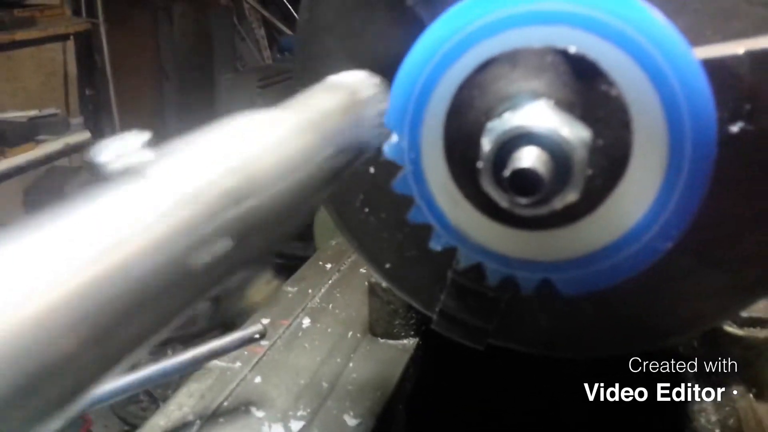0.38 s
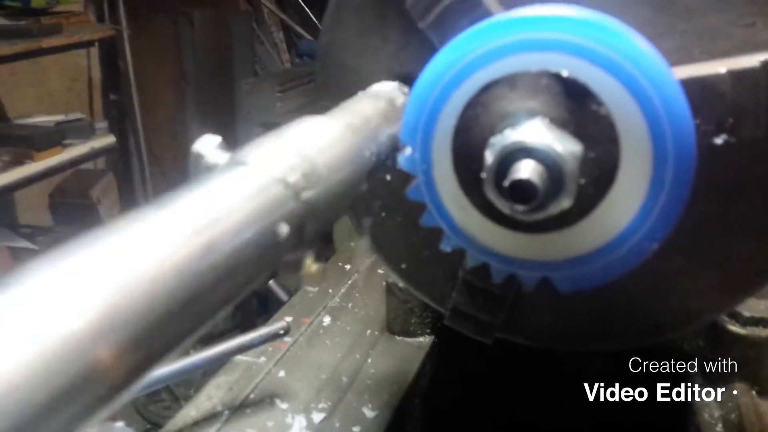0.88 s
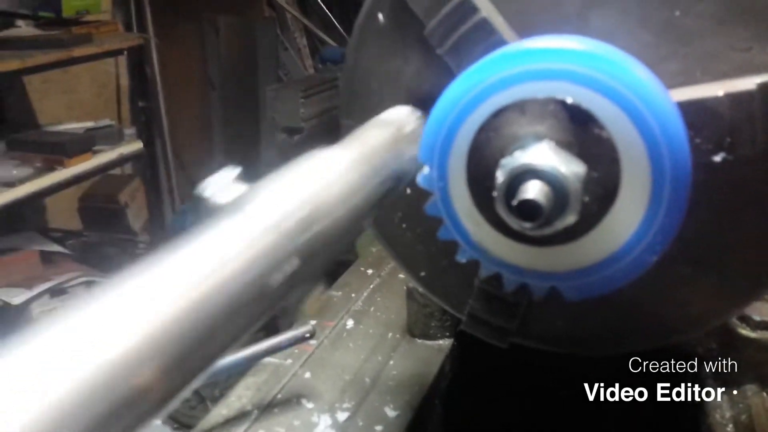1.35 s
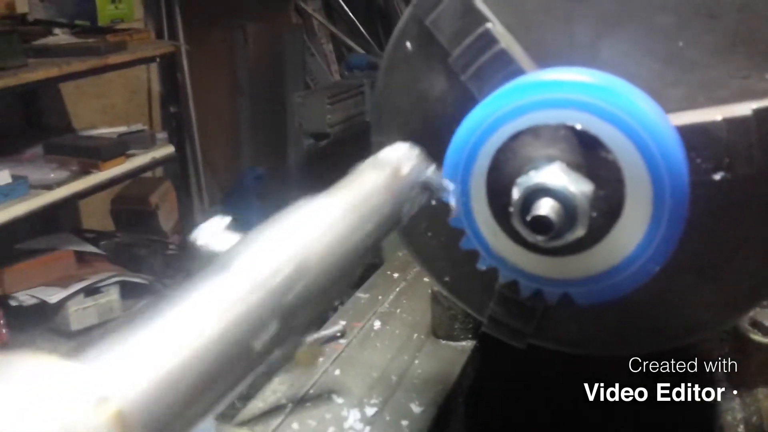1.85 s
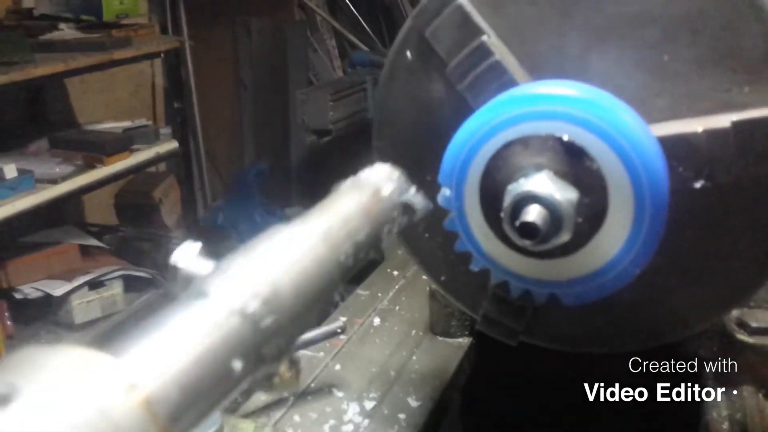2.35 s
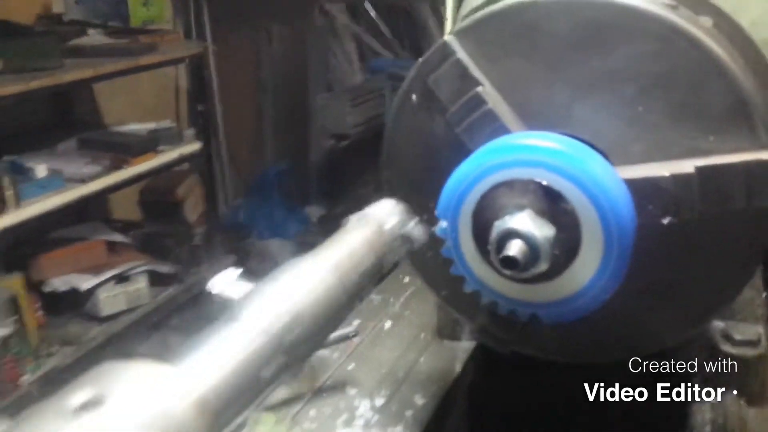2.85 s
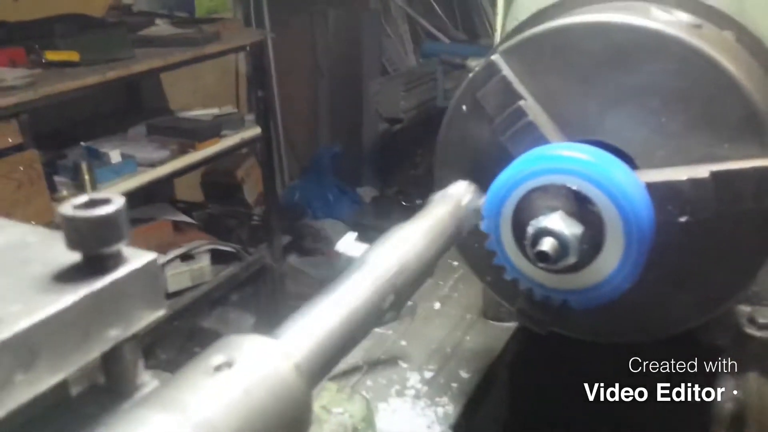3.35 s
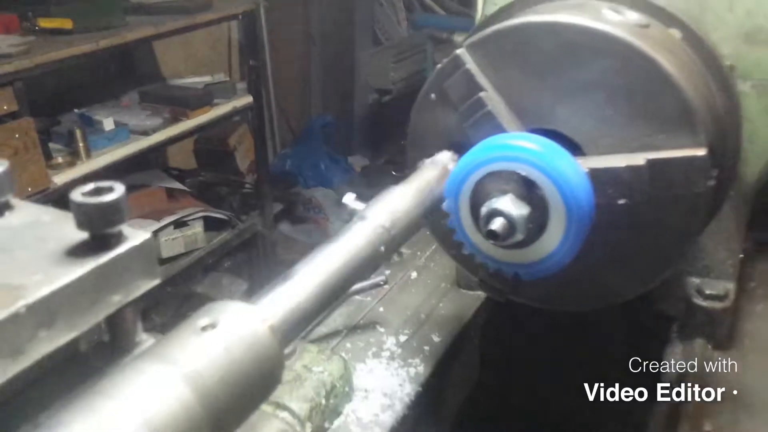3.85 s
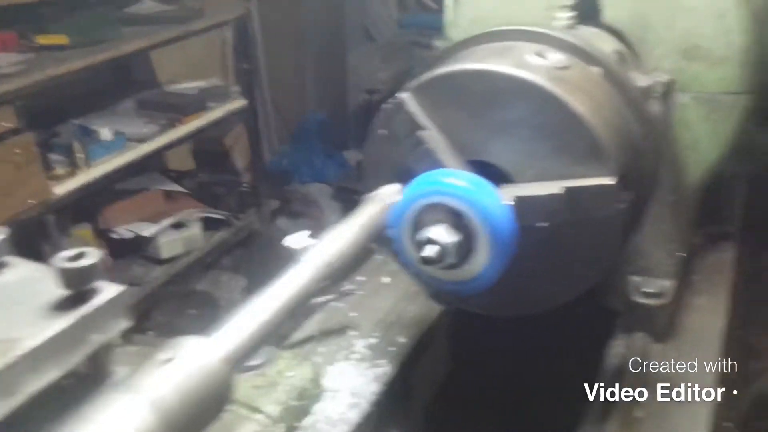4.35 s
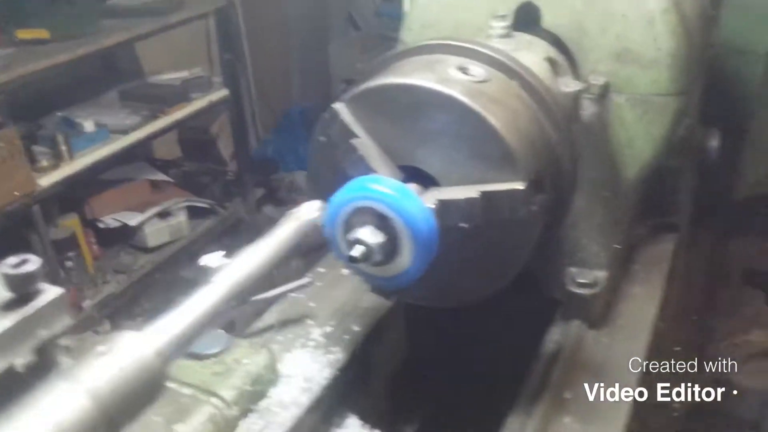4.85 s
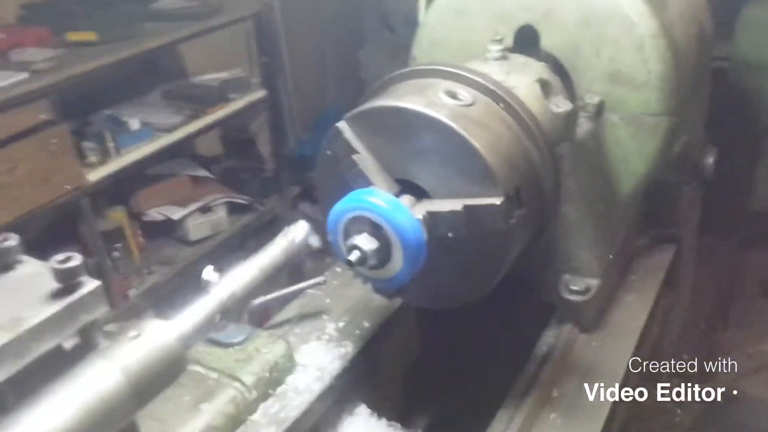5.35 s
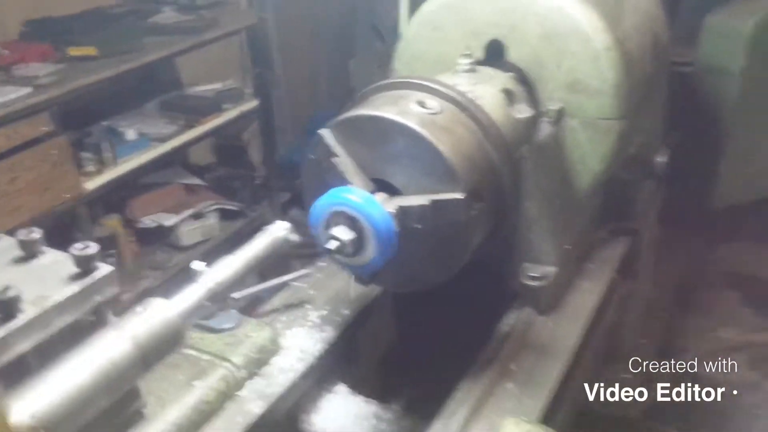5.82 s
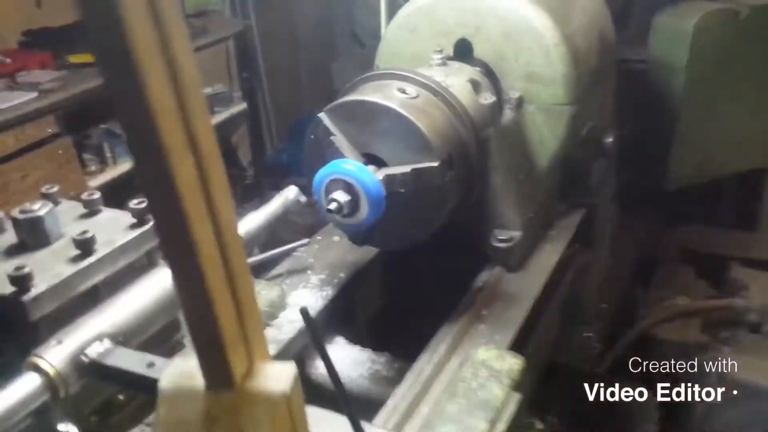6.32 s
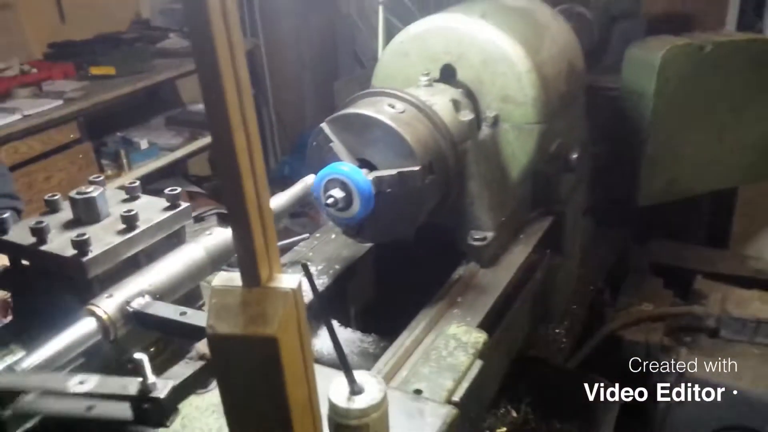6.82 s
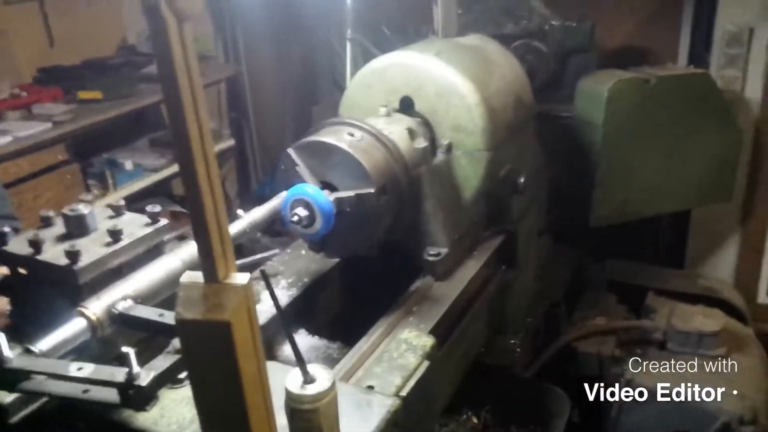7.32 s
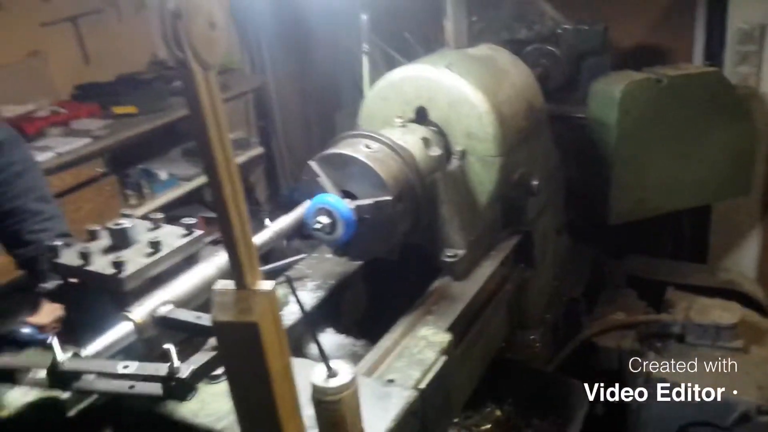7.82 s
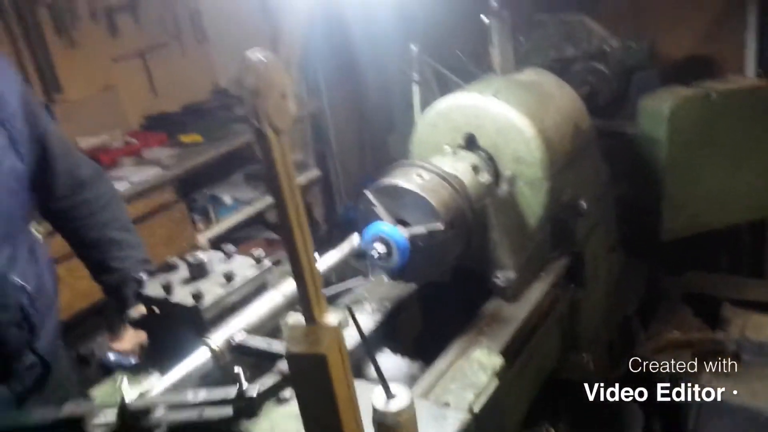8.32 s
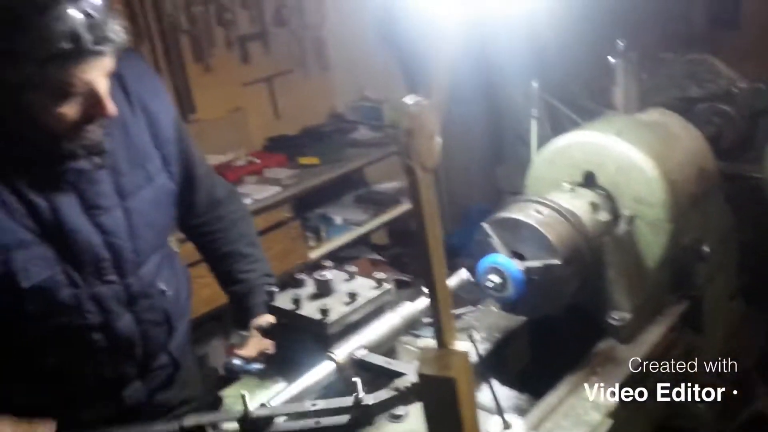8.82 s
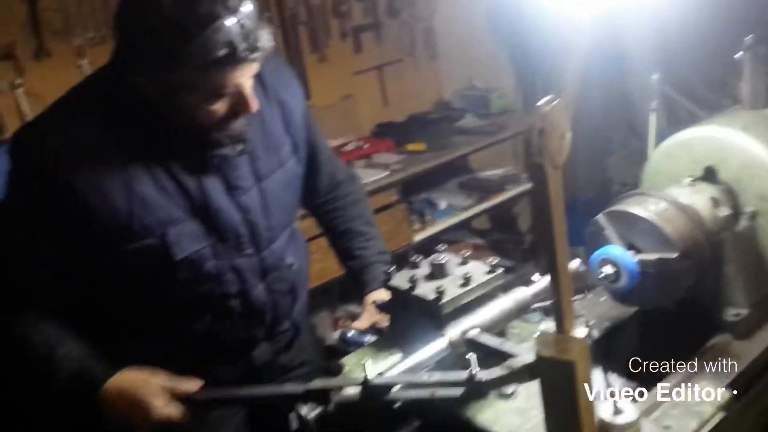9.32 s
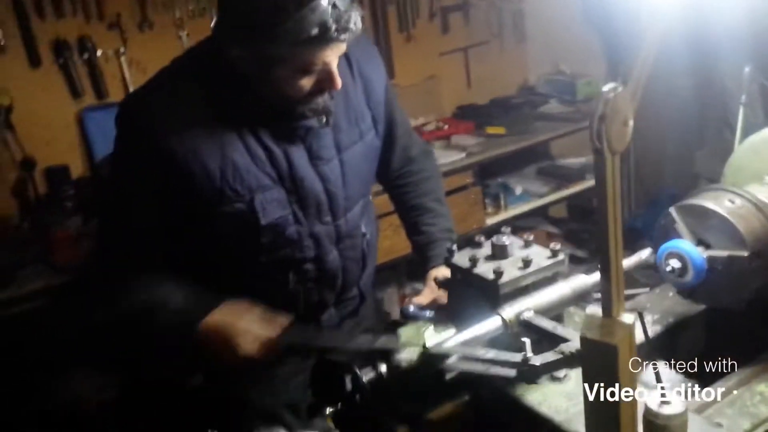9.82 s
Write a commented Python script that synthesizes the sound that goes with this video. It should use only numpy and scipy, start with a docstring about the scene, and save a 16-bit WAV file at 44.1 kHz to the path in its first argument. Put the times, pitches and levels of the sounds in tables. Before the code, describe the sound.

From 0 s, a close, regular metallic rhythm is already running: a softer return scrape, then a sharp cutting bite at about 0.3 s, repeating roughly every 0.43 s to the end near 9.8 s. Each cut is a very short, gritty snap with a bright, high ring and tearing hiss; each return is a slightly longer, quieter rub. Dry chip and linkage ticks scatter between, with a crisp one near 0.4 s and a faint airy swish around 0.2 s. From about 3 to 6 s the phone backs away and strokes soften, losing close hiss. After 6 s they are light and distant, ticks sparser. Faint swishes pass around 5.6, 7.3 and 8.2 s, with a dull, low knock near 8.1 s. Quiet workshop hum and short echoes remain; the right side is clear, the left muffled.

```python
"""Rough metallic strokes, a little over twice a second: a hand lever drives a slotting bar through a gear blank
in a lathe chuck. Each cut is a noisy force on the bar's modes, and each return stroke a softer scrape on the same.
Chips and linkage slack tick between, airy swishes pass, a dull knock falls near the phone, and the shop hums low.
The phone backs away, so modes, tear, drone and stray chips change level on the way.
Its left port is covered, which leaves that side dull and faint."""
import sys
import numpy as np
from scipy import signal
from scipy.fft import rfft, irfft, next_fast_len
from scipy.io import wavfile
from scipy.ndimage import uniform_filter1d

SR = 44100
rng = np.random.default_rng(int(sys.argv[2]) if len(sys.argv) > 2 else 0)


def dump_mix(stems):
    """Bounce the given channels to the path in sys.argv[1] as a 16-bit WAV at rate SR."""
    frames = np.atleast_2d(stems).T  # one column per channel
    limited = np.clip(frames, -1, 1)  # hard clip at full scale
    pcm = np.round(limited * 32767).astype(np.int16)
    wavfile.write(sys.argv[1], SR, pcm)


def undo_db(level):
    """Turn decibels back into plain size, where 20 dB means ten times bigger."""
    steps = np.asarray(level, float) / 20
    return 10 ** steps


N = 437913
T = np.arange(N) / SR
AWAY = T / T[-1]  # how far the phone has backed off: 0 at the start, 1 furthest off

# Cutting strokes of the bar:
# (time [s], length [s], bite force [dB], chatter force [dB], extra level of the ring near 4 kHz [dB])
CUT_STROKES = [(0.281, 0.039, -19.5, -23, -7), (0.707, 0.031, -36, -26.5, 5.5),
               (1.113, 0.036, -27, -25, 0.5), (1.535, 0.036, -52, -29.5, 4), (1.978, 0.027, -20, -27.5, -4),
               (2.42, 0.025, -27.5, -28, 13), (2.862, 0.033, -21.5, -31, 2),
               (3.283, 0.024, -28.5, -30.5, -2), (3.714, 0.029, -33, -33.5, 6.5),
               (4.145, 0.03, -29, -38, 6), (4.584, 0.034, -31, -32, -10), (5.01, 0.027, -31, -32.5, -18),
               (5.444, 0.03, -27, -35.5, -11), (5.874, 0.03, -31, -38, 3), (6.317, 0.036, -35, -46, 11),
               (6.731, 0.04, -49, -44.5, 4), (7.17, 0.035, -37.5, -45, 11), (7.584, 0.03, -36.5, -45.5, -1),
               (8.031, 0.026, -42, -45, -11), (8.464, 0.028, -29.5, -38, -2),
               (8.92, 0.037, -37.5, -48.5, 12), (9.357, 0.032, -36.5, -45.5, 11),
               (9.793, 0.032, -39, -46.5, 8)]
# Return strokes of the bar: (time [s], contact [s], rubbing force at mid-stroke [dB])
RETURN_STROKES = [(0.035, 0.073, -35.5), (0.472, 0.075, -36.5), (0.913, 0.07, -37), (1.327, 0.078, -41.5),
                  (1.757, 0.06, -39), (2.192, 0.062, -40), (2.623, 0.086, -42.5), (3.045, 0.095, -44),
                  (3.474, 0.088, -45.5), (3.904, 0.073, -44.5), (4.344, 0.083, -45), (4.781, 0.078, -46.5),
                  (5.217, 0.093, -48.5), (5.634, 0.067, -46.5), (6.066, 0.089, -57.5), (6.514, 0.082, -54),
                  (6.942, 0.079, -52.5), (7.343, 0.084, -48.5), (7.814, 0.084, -56), (8.237, 0.07, -50.5),
                  (8.674, 0.072, -54.5), (9.121, 0.11, -54.5), (9.559, 0.086, -54.5)]


def along(points, s):
    """Reads a curve of (time, value) points at the times s."""
    return np.interp(s, *np.transpose(points))


def shape(x, points):
    """Colours a sound by (frequency [Hz], level [dB]) points, joined along log frequency."""
    hz, db = np.transpose(points)
    size = next_fast_len(N + SR // 10)
    log_hz = np.log(np.arange(size // 2 + 1) * SR / size + 1)
    gain = undo_db(np.interp(log_hz, np.log(hz), db))
    return irfft(rfft(x, size) * gain, size)[..., :N]


def unit(x):
    """Scales to rms 1."""
    return x / np.sqrt(np.mean(x ** 2))


def ring(x, hz, width_hz):
    """One resonant mode; white noise comes out at about the level it went in."""
    radius = np.exp(-np.pi * width_hz / SR)
    angle = 2 * np.pi * hz / SR
    poles = [1, -2 * radius * np.cos(angle), radius * radius]
    return np.sqrt(1 - radius * radius) * signal.lfilter([1, 0, -1], poles, x)


def grit(grain_s, rough_db):
    """Stick-slip force: noise whose strength wanders from grain to grain."""
    grain = max(int(grain_s * SR), 2)
    steps = np.repeat(rng.standard_normal(N // 2 + 1)[:N // grain + 1], grain)[:N]
    strength = undo_db(rough_db * uniform_filter1d(steps, grain))
    return unit(strength * rng.standard_normal(N))


def lumps(lump_s=0.004, lump_db=3):
    """Uneven cutting force, as the chip builds up and breaks away in lumps."""
    lump = int(lump_s * SR)
    steps = lump_db * rng.standard_normal(N // lump + 2)
    return undo_db(np.interp(np.arange(N) / lump, np.arange(len(steps)), steps))


def cut_force(bite_rise_s=0.0007, bite_s=0.004, build_s=0.0049, exit_s=0.0099, drag_s=0.12):
    """The edge bites hard, chatters through the blank and leaves it; the bar's drag fades from the bite on."""
    # Drag of the bar, read at each cut: (time [s], level 0.1 s after the cut begins [dB])
    drag_curve = [(0, -50.5), (5.5, -50.5), (6.8, -55), (8.2, -50.5), (9.9, -50)]
    force, drag = np.zeros((2, N))
    uneven = lumps()
    for s, length, bite_db, chatter_db, _ in CUT_STROKES:
        i = int(s * SR)
        t = T[:min(SR // 2, N - i)]
        span = slice(i, i + len(t))
        bite = undo_db(bite_db) * np.exp(-t / bite_s) * (1 - np.exp(-t / bite_rise_s))
        leaving = np.exp(-np.maximum(t - length, 0) / exit_s)
        through = undo_db(chatter_db) * leaving * (1 - np.exp(-t / build_s))
        force[span] += bite + through * uneven[span]
        drag[span] += undo_db(along(drag_curve, s)) * np.exp((0.1 - t) / drag_s)
    return force, drag


def return_force(rise_s=0.0038, let_go_s=0.003, sag_db_per_s=-28.5):
    """The flank rubs back along the fresh tooth, swelling in, easing off and letting go."""
    force = np.zeros(N)
    for s, length, db in RETURN_STROKES:
        start, stop = max(int((s - 0.05) * SR), 0), int((s + length + 0.05) * SR)
        t = T[start:stop] - s
        gate = 1 / (1 + np.exp(-t / rise_s)) / (1 + np.exp((t - length) / let_go_s))
        force[start:stop] = gate * undo_db(db + sag_db_per_s * (t - length / 2))
    return force


def bar_modes(cutting, returning, dragging, drag_ring_db=-4, drag_dull_db=-3, scatter_db=2,
              tilt_scatter_db=2.5, sharpest=40):
    """The bar and bed modes, shaken by all three forces, with a fresh balance at every stroke."""
    # Modes of bar and bed: (frequency [Hz], width before damping [Hz], level cutting [dB],
    # level returning [dB], change with the phone half way off [dB], change furthest off [dB])
    mode_table = [(635, 450, -39.5, -33, 15, 5.5), (1500, 550, -44.5, -25, 11.5, 10.5),
                  (2499, 61, -20, -11.5, 8, 3), (2757, 102, -14, -17, 11, 3), (3310, 67, 1.5, -1, 0, -2.5),
                  (3442, 41, -1, -5.5, -0.5, 3.5), (3917, 33, -2, -1.5, -4.5, -3),
                  (4010, 27, -22, -20.5, -11, 1), (4360, 30, -19, -29, 5, -8),
                  (4840, 73, -54, -30, 12.5, -38), (5490, 100, -54.5, -35, 21, 9),
                  (7310, 114, -12, -22, 4.5, 6.5), (7240, 100, -19.5, -21.5, 13.5, 11.5),
                  (9520, 420, -17.5, -20, 6, -12), (11400, 1300, -24.5, -25, 15, 14)]
    # Extra ring near 4 kHz on the return: (time [s], level [dB])
    return_4k = [(0, 0.5), (2.6, 5.5), (3.9, 6), (4.8, -8), (5.3, 0), (5.9, 5), (8.2, 2), (9.6, 3)]
    # the balance changes 20 ms ahead of each stroke
    starts = np.sort([0] + [row[0] - 0.02 for row in CUT_STROKES + RETURN_STROKES])
    stroke = np.searchsorted(starts, T, side="right") - 1
    tilt_db = tilt_scatter_db * rng.standard_normal(len(starts))  # per octave from 3300 Hz
    cut_4k_db = along([(row[0], row[4]) for row in CUT_STROKES], starts)
    return_4k_db = along(return_4k, starts)
    modes = 0
    for hz, width, cut_db, back_db, half_db, far_db in mode_table:
        db = np.interp(starts, [0, T[-1] / 2, T[-1]], [0, half_db, far_db])
        db = db + scatter_db * rng.standard_normal(len(starts))
        near_4k = np.exp(-((hz - 4000) / 300) ** 2)
        # each bite loads the bar differently and leans its ring darker or brighter
        lean_db = tilt_db * np.clip(np.log2(hz / 3300), -1, 1)
        cut = undo_db(db + cut_db + lean_db + cut_4k_db * near_4k)
        rubbed = undo_db(db + back_db + return_4k_db * near_4k)
        # the light drag after a cut hardly stirs the high modes
        dull_db = drag_dull_db * max(np.log2(hz / 4000), 0)
        dragged = undo_db(db + back_db + drag_ring_db + dull_db)
        push = cut[stroke] * cutting + rubbed[stroke] * returning + dragged[stroke] * dragging
        # the clamped bar is damped: no mode is narrower than its pitch over `sharpest`
        modes = modes + ring(push, hz, max(width, hz / sharpest))
    return undo_db(-8.5) * modes


def tearing(force, back, drag, cut_db=-5, back_db=-16, drag_db=-8, far_db=-7):
    """The tearing chip: a broad, smoother hiss, close detail that fades as the phone backs off."""
    # Colour of the tear: (frequency [Hz], level [dB])
    tear_colour = [(300, -34), (1200, -36.5), (2500, 6), (4000, 13), (6000, 1.5), (9000, -5), (13000, -3),
                   (16000, -13.5)]
    strength = undo_db(cut_db) * force + undo_db(back_db) * back + undo_db(drag_db) * drag
    hiss = strength * grit(grain_s=0.0027, rough_db=0.5)
    return shape(hiss * undo_db(far_db * AWAY), tear_colour)


def bed_drone(drag, hz=143, width_hz=16.5, rest_db=-88, gain_db=-31.5, far_db=-11.5):
    """The lathe bed's low drone: noise that grows with the drag, in one narrow mode."""
    strength = (undo_db(rest_db) + undo_db(gain_db) * drag) * undo_db(far_db * AWAY)
    return ring(strength * rng.standard_normal(N), hz, width_hz)


def slotting_bar():
    """Both strokes shake the same modes and tear the chip; the bed drones below."""
    force, drag = cut_force()
    back = return_force()
    cutting = force * grit(grain_s=0.0012, rough_db=3.0)
    rasp = grit(grain_s=0.0014, rough_db=3.5)
    modes = bar_modes(cutting, rasp * back, rasp * drag)
    return modes + tearing(force, back, drag) + bed_drone(drag)


def stray_chips(per_s=18, near_db=-53, far_db=-10, scatter_db=5, colour=0.38):
    """Faint loose chips at random times, as rows of contacts; they weaken as the phone backs off."""
    times = np.cumsum(rng.exponential(size=300)) / per_s
    chance = rng.standard_normal((300, 2))
    return [(s, 0.002, near_db + far_db * s / T[-1] + scatter_db * a, colour + 0.33 * b)
            for s, (a, b) in zip(times, chance)]


def ticks(fall_db=9, tail_db=-15, tail_s=0.0033):
    """Each tick of chip or linkage is a short rough contact into wide, dry modes."""
    # Ticks of chips and linkage: (time [s], contact [s], level [dB], colour [octaves above 4 kHz])
    contacts = [(0.126, 0.0038, -33, 0), (0.2162, 0.0042, -31, -0.06), (0.3754, 0.002, -28, 0),
                (0.3883, 0.0026, 7.5, 2.5), (0.566, 0.008, -45.5, 0.1), (0.644, 0.0078, -41.5, -0.5),
                (1.0703, 0.0022, -24.5, 0.5), (1.142, 0.011, -21, 1.8), (1.221, 0.011, -41, 0),
                (1.2605, 0.0029, -19.5, 1.5), (1.4135, 0.016, -48, 0), (1.4859, 0.0026, -43, -0.5),
                (1.6268, 0.003, -13, 2.3), (1.758, 0.0021, -34.5, -0.67), (1.8252, 0.0072, -31.5, 0.6),
                (1.8302, 0.0046, -27, -0.18), (1.9128, 0.011, -47.5, -0.13), (2.2583, 0.0013, -15, 2.3),
                (2.2677, 0.0031, -26.5, -0.13), (2.331, 0.0044, -47.5, 0), (2.4987, 0.0022, -31, 0.6),
                (2.7007, 0.0059, -23.5, 0), (2.7639, 0.0023, -31, -0.47), (2.829, 0.0022, -47, -0.8),
                (2.853, 0.0026, -45, 0.5), (2.9195, 0.0071, -36.5, 1.5), (2.9465, 0.0048, -39, 0),
                (3.1285, 0.0061, -21, 1.8), (3.2073, 0.00096, -39.5, 0.3), (3.3362, 0.009, -32, 2),
                (3.373, 0.0057, -32.5, 0.2), (3.5463, 0.0036, -30.5, 2.5), (3.5501, 0.0073, -28, 0.42),
                (3.6632, 0.0032, -52, -0.2), (3.7607, 0.0025, -36, -1.5), (3.786, 0.002, -36, -7),
                (3.935, 0.0011, -28, -8), (4.066, 0.002, -52, 0.3), (3.7718, 0.0016, -24, 0.8),
                (3.9875, 0.0027, -23.5, 0.3), (4.2015, 0.0018, -31.5, 0.6), (4.2312, 0.0027, -28.5, 0.4),
                (4.236, 0.0026, -45, -0.5), (4.2825, 0.0004, -24.5, 1.5), (4.4208, 0.0077, -35, 0.15),
                (4.6373, 0.0065, -39, 0.7), (4.6668, 0.0016, -33.5, 0.4), (4.8558, 0.0032, -34.5, 0.4),
                (4.8609, 0.0075, -42.5, 0.2), (4.9181, 0.005, -53, -0.1), (5.2918, 0.0019, -37, 1),
                (5.2972, 0.0026, -33, 0.06), (5.353, 0.0062, -49.5, 0), (5.5052, 0.0019, -34, -0.1),
                (5.5494, 0.0047, -39.5, 0.3), (5.7151, 0.0045, -37.5, 0.3), (5.7755, 0.0014, -36.5, 0),
                (5.827, 0.0024, -48.5, -0.5), (5.953, 0.009, -40.5, -2.2), (6.053, 0.0024, -45, 1.2),
                (6.158, 0.003, -56, -1.9), (6.2508, 0.0027, -58, 0.3), (6.2883, 0.0026, -46, 1.1),
                (6.68, 0.004, -61, -1.2), (6.4907, 0.003, -32, 2), (7.0131, 0.0094, -48, 0.6),
                (7.4407, 0.0064, -47, -0.1), (7.72, 0.0035, -56, -1.1), (7.9, 0.0099, -51.5, 0.1),
                (7.976, 0.003, -44.5, -2.14), (8.031, 0.002, -46, 0), (8.135, 0.0058, -36, 0.5),
                (8.8146, 0.0033, -53, 0.1), (9.2567, 0.0033, -48, 0), (9.302, 0.0047, -55.5, -1.2),
                (9.692, 0.0036, -57, -0.1), (9.6294, 0.0031, -43, 0.1)]
    # Modes a tick rings with, in a low, middle and high group:
    # (frequency [Hz], width of the first of two passes [Hz], level [dB])
    mode_groups = [
        [(1670, 630, 5.5), (2380, 1900, 14.5)],
        [(3920, 2100, -13), (5000, 680, 2), (6200, 400, -12)],
        [(8860, 3100, -1.5), (10730, 1300, -10), (14400, 3200, -10)],
    ]
    # Middle of each group: (colour [octaves above 4 kHz], level to even the groups out [dB])
    group_middles = [(-0.87, -7.5), (0.6, -3.5), (1.02, -6)]
    middle, even_db = np.transpose(group_middles)
    blows = np.zeros((3, N))
    for s, contact, db, colour in [*contacts, *stray_chips()]:
        i = int(s * SR)
        push = np.hanning(max(int(contact * SR), 8))[:max(N - i, 0)]
        # a group weakens with the square of its distance from the tick's colour
        group_db = db + even_db - fall_db * (middle - colour) ** 2
        blows[:, i:i + len(push)] += undo_db(group_db)[:, None] * push
    # a short diffuse tail, like early echoes, follows every contact
    keep = np.exp(-1 / (tail_s * SR))
    blows = blows + undo_db(tail_db) * signal.lfilter([4 * (1 - keep)], [1, -keep], blows)
    blows = blows * rng.standard_normal((3, N))
    out = np.zeros(N)
    for blow, group in zip(blows, mode_groups):
        for hz, width, db in group:
            rung = ring(ring(blow, hz, width), hz, 2 * width)
            out += undo_db(db) * rung * np.sqrt(width / SR)
    return out


def rub(focus_db=-3, edge_db=-16):
    """Airy swishes, perhaps a sleeve or the slide: broad hiss that swells and fades, with one soft peak."""
    # Swishes: (time [s], swell [s], hold [s], fade [s], level of the broad hiss [dB], peak [Hz])
    swishes = [(0.156, 0.073, 0.056, 0.046, -44, 4820), (5.505, 0.15, 0.068, 0.069, -56, 5000),
               (7.21, 0.035, 0.12, 0.17, -54, 4680), (8.187, 0.07, 0.043, 0.038, -51.5, 5620),
               (8.315, 0.022, 0.03, 0.061, -49, 6200), (8.997, 0.21, 0.21, 0.065, -64.5, 5000)]
    # Colour of the hiss: (frequency [Hz], level [dB])
    hiss_colour = [(500, -13.5), (1500, -6), (2500, -2.5), (5000, -2.5), (9000, -6), (13000, -3.5),
                   (16000, -12)]
    out = np.zeros(N)
    hiss = unit(shape(grit(grain_s=0.0028, rough_db=-3.0), hiss_colour))
    for s, swell, hold, fade, db, hz in swishes:
        span = slice(int((s - 0.01) * SR), int((s + swell + hold + fade + 0.01) * SR))
        corners = np.cumsum([s - 0.01, 0.01, swell, hold, fade, 0.01])
        level = np.interp(T[span], corners, [-120, db + edge_db, db, db, db + edge_db, -120])
        peak = unit(ring(hiss[span], hz, width_hz=1000))
        out[span] += undo_db(level) * (hiss[span] + undo_db(focus_db) * peak)
    return out


def knock(at_s=8.134, hz=620, width_hz=700, t60_s=0.17, level_db=-60.5):
    """A dull knock near the phone: a short burst of noise in one wide low resonance."""
    fall_db = -60 * np.maximum(T - at_s, 0) / t60_s
    burst = (T >= at_s) * undo_db(level_db + fall_db) * rng.standard_normal(N)
    return ring(ring(burst, hz, width_hz), hz, 2 * width_hz)


def room(x, t60_s=0.25):
    """Dense echoes off benches and walls: decaying noise tails, unlike at the two ports."""
    t = T[:SR // 2]
    tail = rng.standard_normal((2, len(t))) * undo_db(-60 * t / t60_s) * (t > 0.004)
    tail = tail / np.sqrt(np.sum(tail ** 2, axis=1, keepdims=True))
    return signal.fftconvolve(x[None], tail, axes=1)[:, :N]


def covered_port(near, echo, lag=14, echo_db=1):
    """The left port hears the lathe and its echoes through the cover, the direct sound late by lag [samples]."""
    # The covered port against the open one: (frequency [Hz], level [dB])
    cover = [(60, -10), (150, 5), (380, 0), (700, -7.5), (1300, -13), (2400, -22.5), (3300, -38.5),
             (4400, -35), (8000, -43), (15000, -41)]
    return shape(np.roll(near, lag) + undo_db(echo_db) * echo, cover)


def shop_noise(open_db=-65):
    """Steady coloured noise of the workshop, unlike at the two ports and weaker at the covered one."""
    # Colour of the workshop: (frequency [Hz], level [dB])
    shop_colour = [(15, -42), (25, -4), (92, 1), (840, -8), (1020, -9.5), (1330, -9.5), (5570, -10),
                   (6380, -13.5), (16000, -15)]
    # Workshop at the covered port against the open one: (frequency [Hz], level [dB])
    left_colour = [(60, -6.5), (300, -2.5), (1500, -11), (8000, -8)]
    left, right = unit(shape(rng.standard_normal((2, N)), shop_colour)) * undo_db(open_db)
    return np.array([shape(left, left_colour), right])


def scene(echo_db=-20):
    """The lathe reaches the open right port directly and the left one late and muffled."""
    near = slotting_bar() + ticks() + rub()
    echo = room(near)
    left = covered_port(near, echo[0])
    shop = shop_noise()
    right = near + undo_db(echo_db) * echo[1]
    knock_balance = undo_db(np.array([[-4], [0]]))  # left, right [dB]
    return np.array([left, right]) + knock() * knock_balance + shop


def low_pass(x):
    """Removes everything above the highest recorded frequency."""
    return signal.sosfilt(signal.butter(12, 16530, fs=SR, output="sos"), x)


def record(dry):
    """The phone's microphones roll off the very top, above 15.3 kHz."""
    roll_off = signal.ellip(6, 1, 30, 15300, fs=SR, output="sos")
    mix = signal.sosfilt(roll_off, dry)
    return low_pass(mix)


dry = scene()
out = record(dry)
dump_mix(out)
```